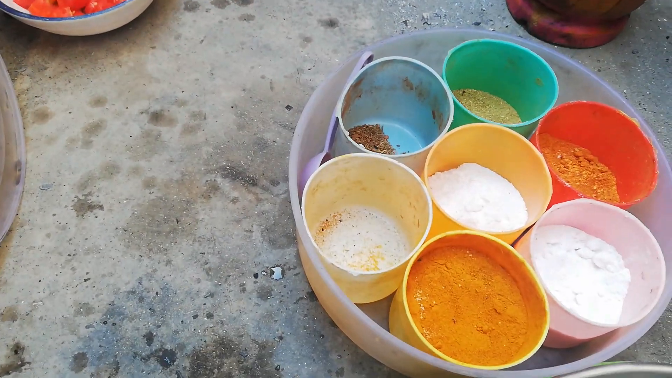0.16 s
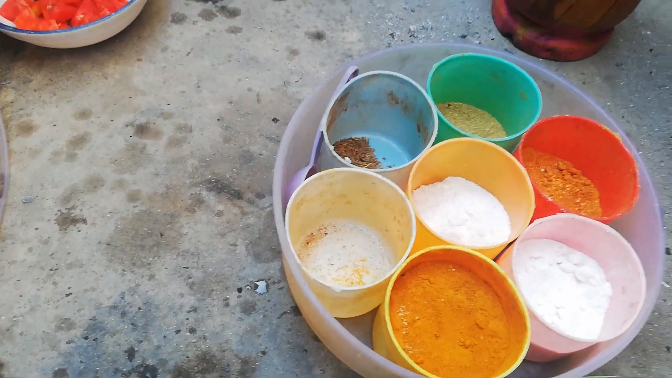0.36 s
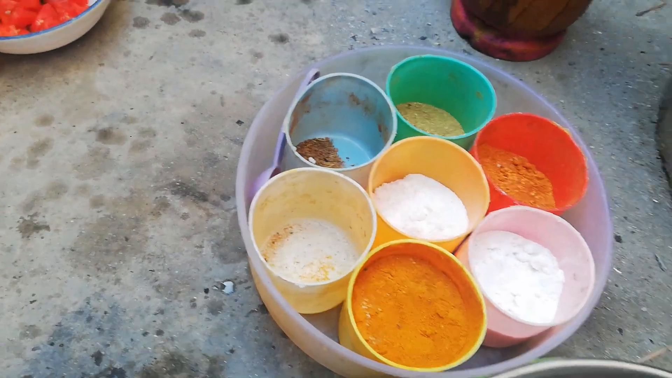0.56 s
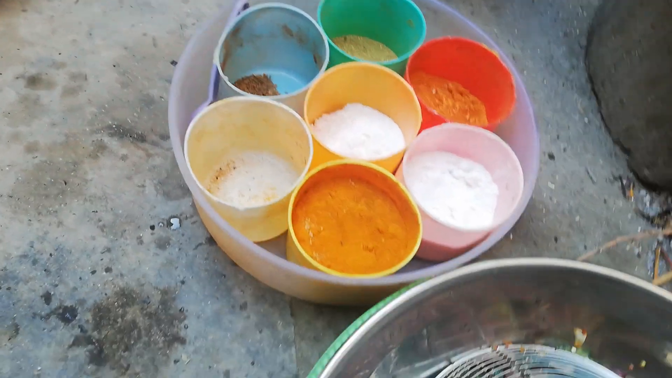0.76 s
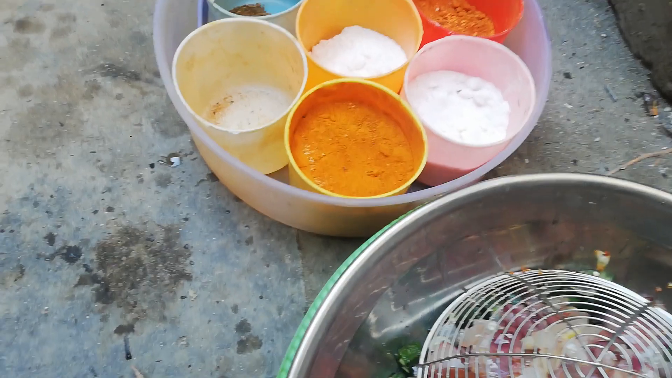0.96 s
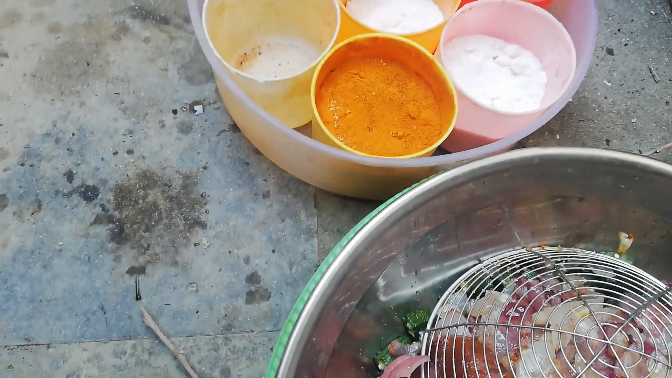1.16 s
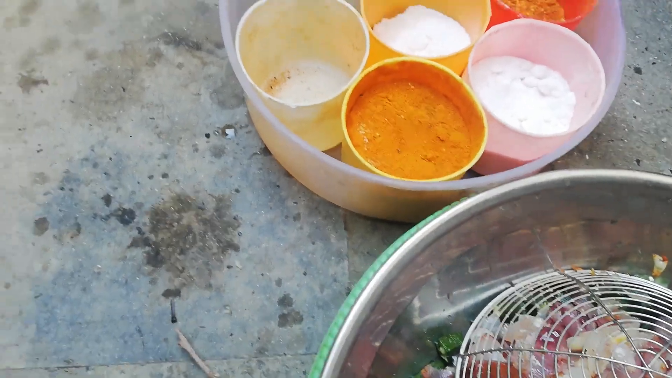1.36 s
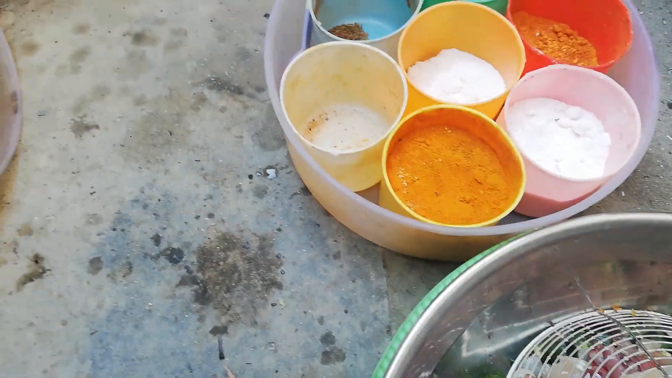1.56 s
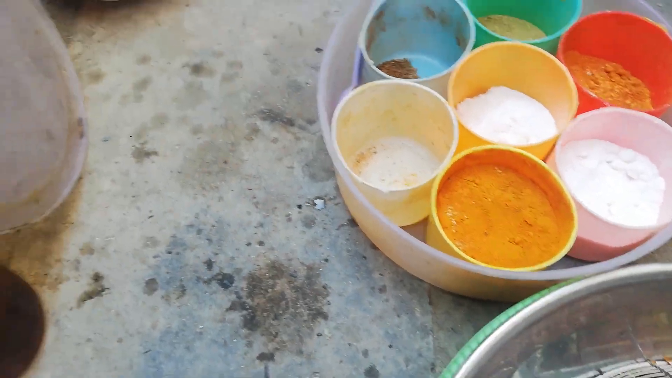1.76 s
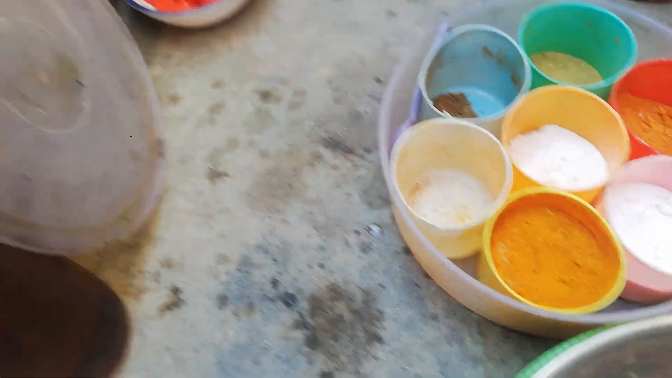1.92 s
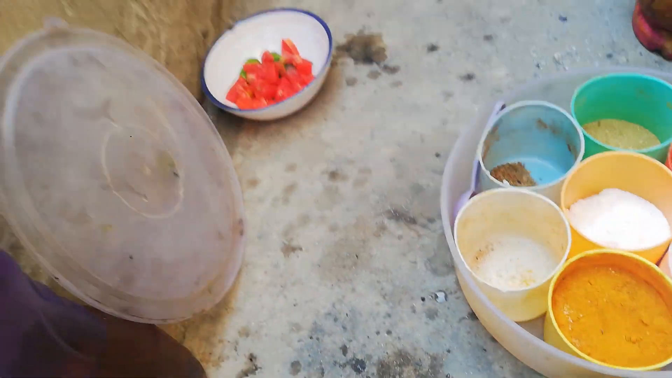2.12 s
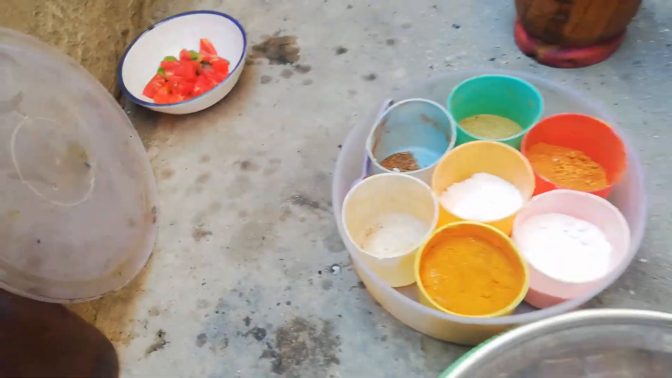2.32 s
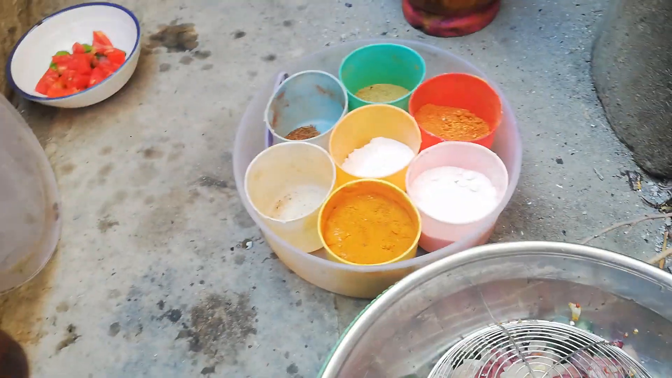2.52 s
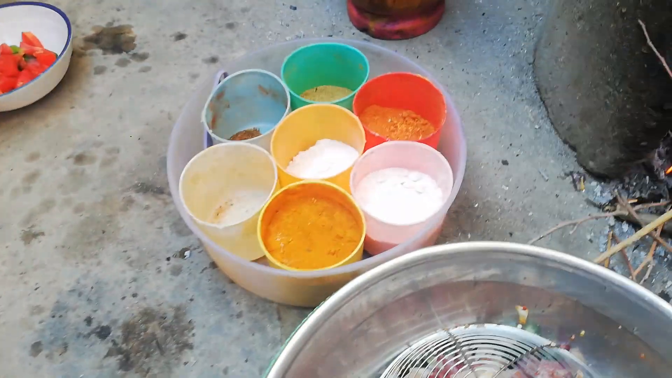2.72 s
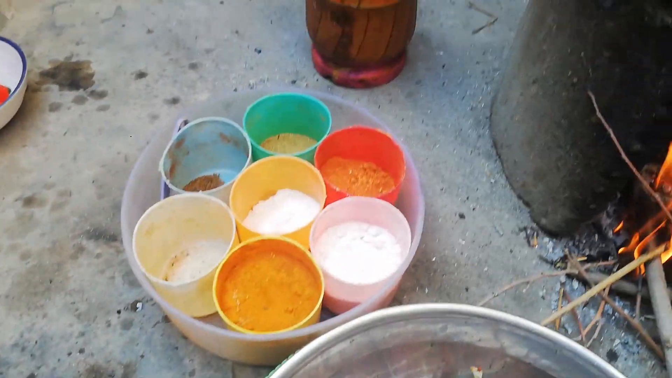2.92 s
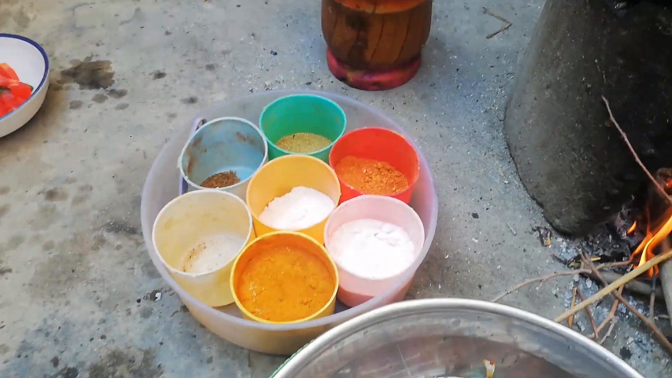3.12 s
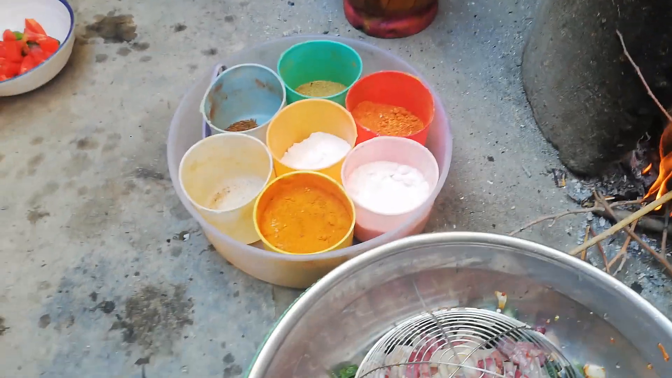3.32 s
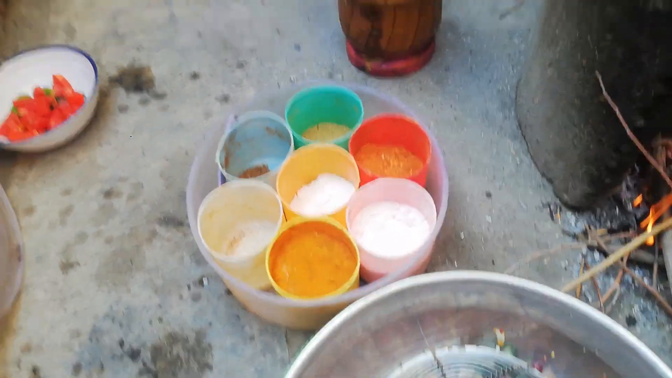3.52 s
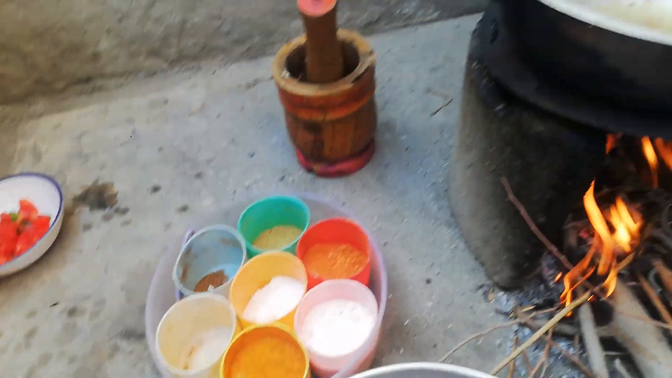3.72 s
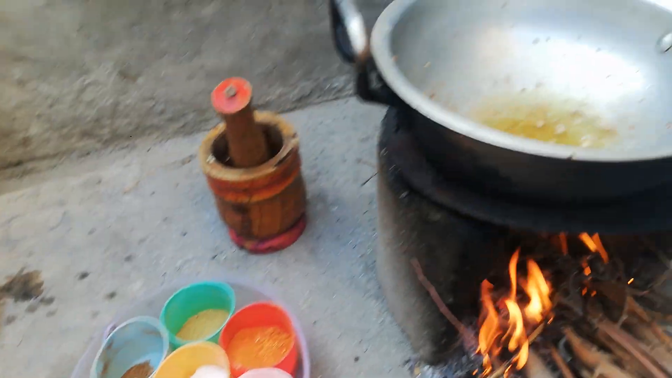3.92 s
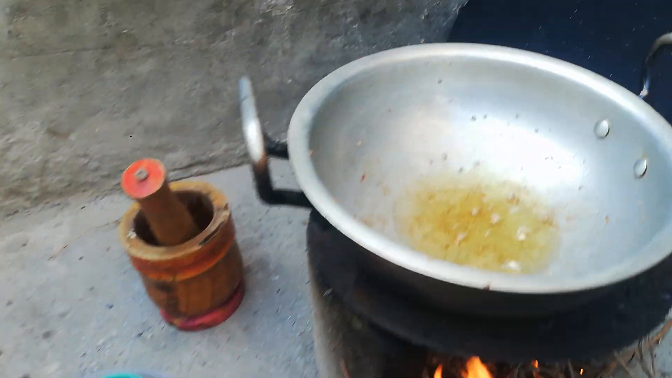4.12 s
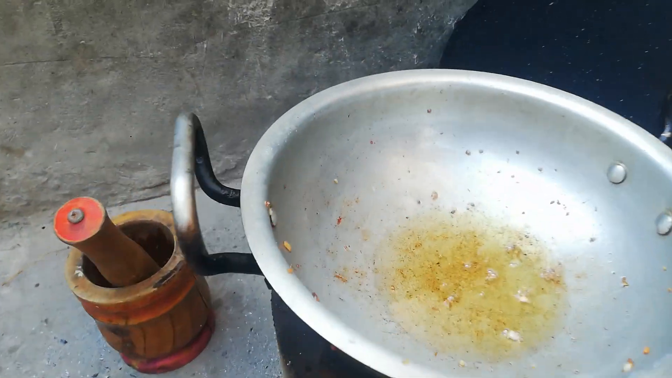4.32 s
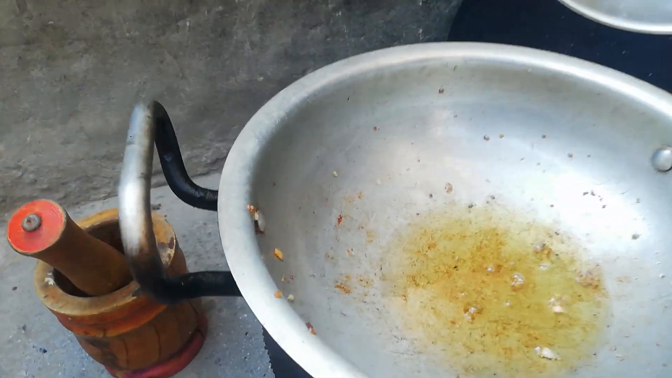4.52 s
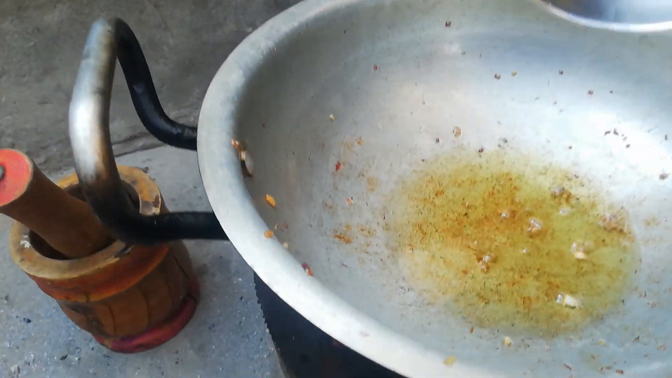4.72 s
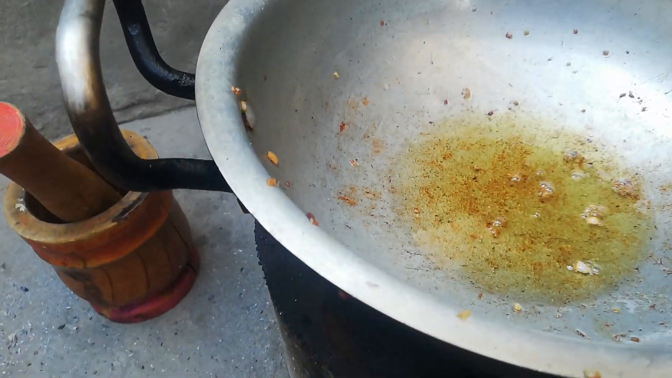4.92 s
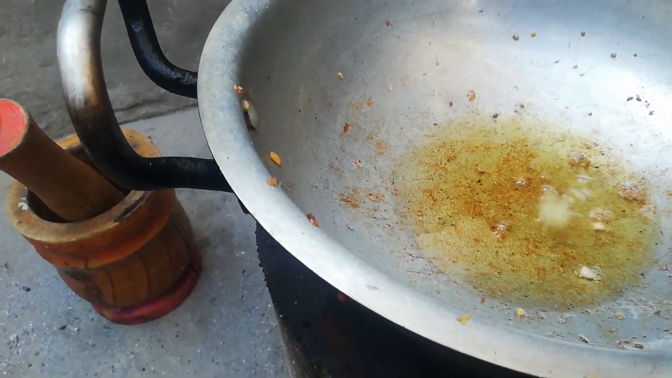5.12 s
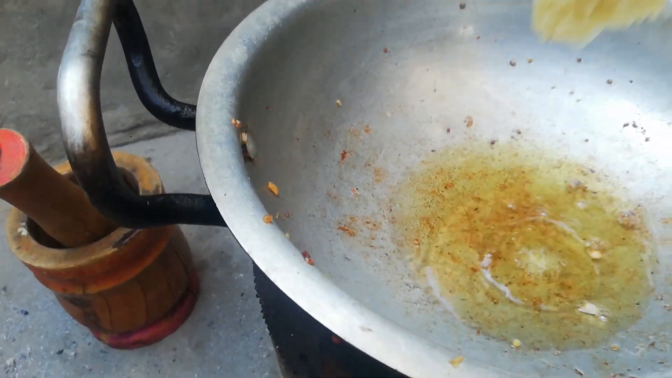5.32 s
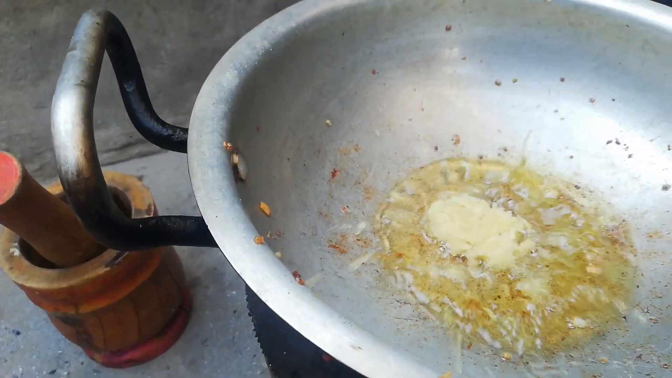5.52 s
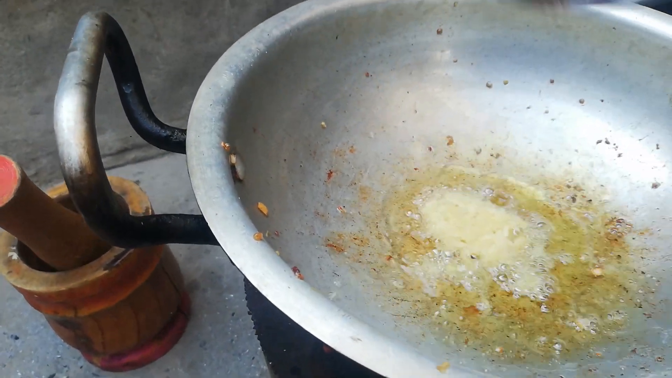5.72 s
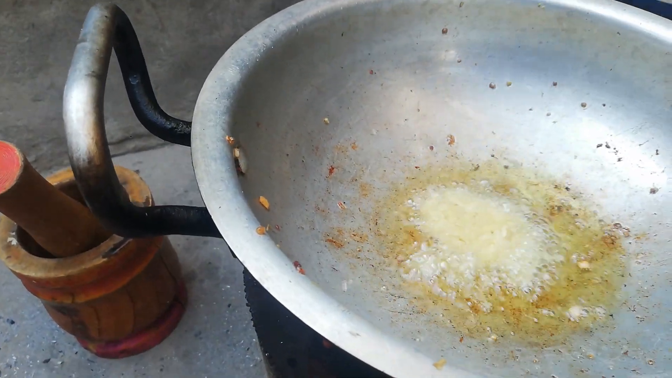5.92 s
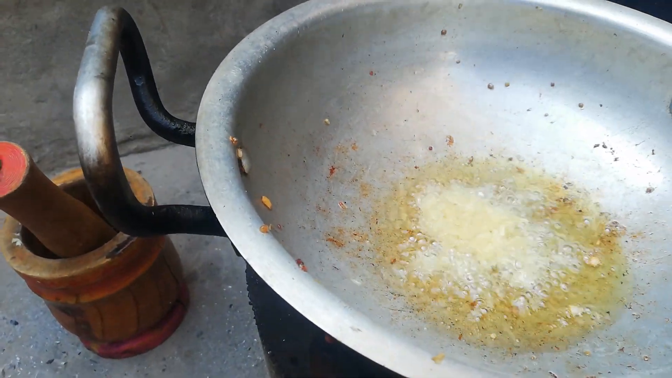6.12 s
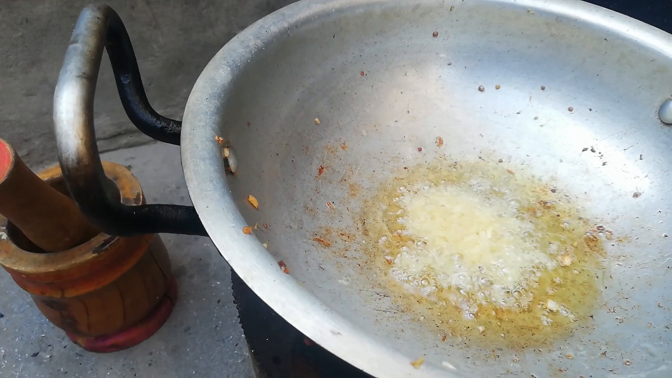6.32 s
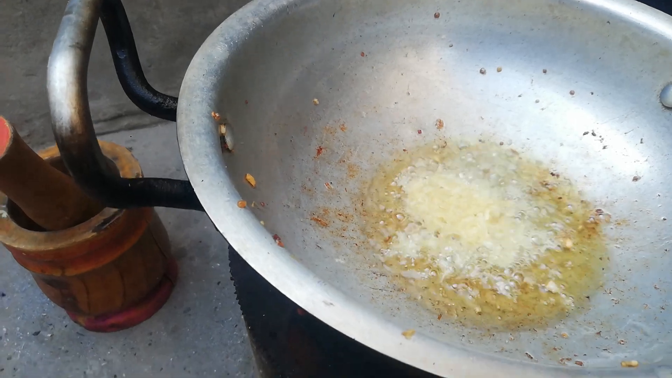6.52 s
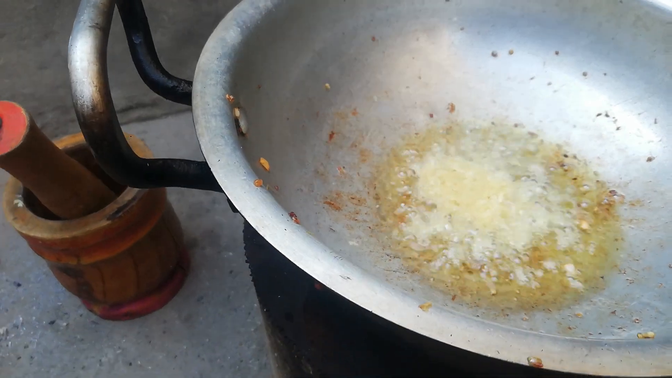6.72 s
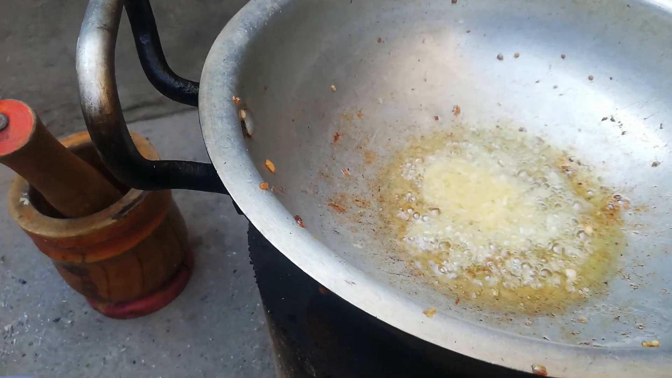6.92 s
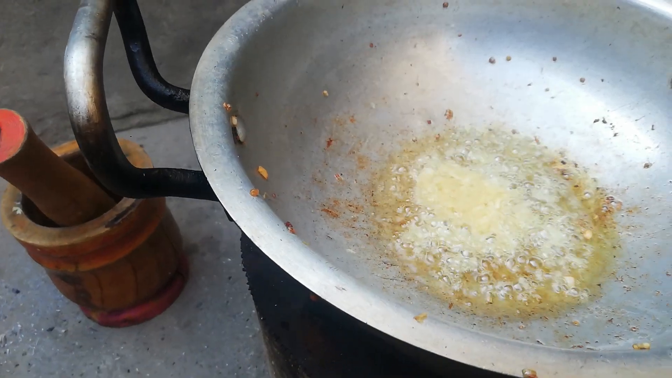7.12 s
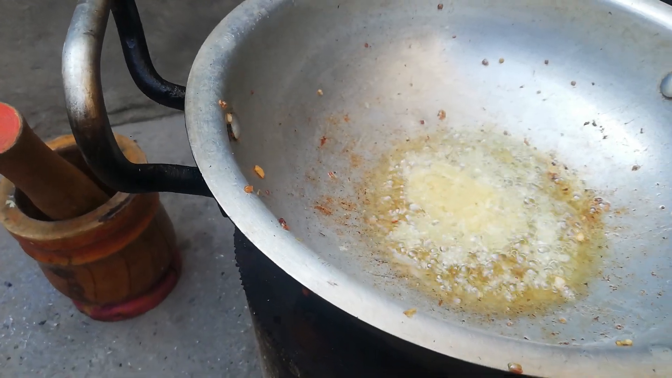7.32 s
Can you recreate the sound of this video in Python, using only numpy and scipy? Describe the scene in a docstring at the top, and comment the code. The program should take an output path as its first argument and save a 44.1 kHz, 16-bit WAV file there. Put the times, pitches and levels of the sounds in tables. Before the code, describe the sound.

A utensil knocks steadily on a hollow vessel outdoors, then near quiet with small fire snaps, until wet paste hits hot oil and sizzles loudly.

```python
"""Outdoor cooking on a wood stove: a utensil is knocked against a vessel while oil heats in a metal wok.
A few drips, then a lump of wet paste land in the oil, which sizzles and spits; metal clinks on the wok.
A low rumble lies under it all, and the right microphone port hears much more treble than the left."""
import sys
import numpy as np
from scipy import signal
from scipy.fft import rfft, irfft, next_fast_len
from scipy.io import wavfile
from scipy.ndimage import uniform_filter1d, map_coordinates

SR = 44100
rng = np.random.default_rng(int(sys.argv[2]) if len(sys.argv) > 2 else 0)


def bounce(signal):
    """Save signal as a 16-bit WAV file at the path given by the first command-line argument."""
    frames = np.transpose(np.atleast_2d(signal))
    limited = np.clip(frames, -1, 1)
    pcm = np.round(limited * 32767).astype(np.int16)
    wavfile.write(sys.argv[1], SR, pcm)


N = 328986

# blows of the utensil on the vessel: (s, strength dB, hardness: clack over body in dB)
KNOCKS = [(0.001, -31.5, -5), (0.211, -18.5, 3.5), (0.451, -19, 4), (0.7035, -16, 7), (0.9539, -16, 6), (1.2115, -18.5, -2), (1.224, -21, 2), (1.448, -15.5, 2), (1.598, -28.5, -9), (1.628, -18.5, 5.5), (1.765, -29, -0.5), (1.787, -30, -2.5), (1.915, -35.5, -8.5), (1.945, -47, -4.5), (3.576, -53, 1)]
VESSEL = [(415.2, 1.5, 0.14), (551, -14, 0.15), (760, -13.5, 0.3), (808, -1.5, 0.079), (993, -1, 0.069), (1071, -6.5, 0.25), (1306, -7, 0.034), (1610, -17.5, 0.17), (1750, -2.5, 0.045), (2150, -11, 0.055), (2176, 1.5, 0.067), (2329, 4.5, 0.036), (2534, -10.5, 0.043), (2996, -1, 0.025)]  # (Hz, dB, t60 s)
CLACK = [(59, -42), (100, -20), (177, -2), (415, -6), (595, -13), (768, -3.5), (1580, -16.5), (2270, -5), (2580, -2.5),
         (3050, -13), (3540, -26.5), (5190, -20.5), (6560, -40.5), (8460, -29), (16000, -50)]  # (Hz, dB per Hz)
CLACK_LIFE = [(200, 0.33), (800, .07), (2200, 0.051), (5000, 0.042), (12000, 0.041)]  # (Hz, t60 s)
# dull handling bumps: (s, peak dB)
BUMPS = [(0.081, -24), (0.515, -29), (1.315, -21.5), (1.674, -22.5), (1.734, -25), (1.844, -16), (1.872, -24.5),
         (1.988, -18.5)]
BUMP_MODES = [(162, -4.5, 0.27), (197, -5, 0.056), (234, 8, 0.1), (280, -4, 0.21), (330, -12, 0.034), (397, -3.5, 0.063), (620, -16.5, 0.043), (810, -13.5, 0.045)]  # (Hz, dB, t60 s)
# small dry ticks and snaps: (s, peak dB, pitch Hz)
TICKS = [(0.0492, -26, 7440), (0.1175, -29, 10320), (0.4284, -32.5, 9840), (0.478, -28.5, 7185), (1.6214, -16.5, 11400), (1.9764, -27, 10950), (2.955, -36.5, 9900), (3.2964, -37, 9750), (3.7311, -28.5, 9170), (3.92, -24.5, 10410), (4.8119, -31.5, 9200), (5.0798, -26.5, 10280)]
# the loudest bursts of steam in the oil: (s, peak dB, pitch Hz)
SPITS = [(5.4311, -13, 10620), (5.5546, -12, 4670), (6.1245, -9, 4500), (6.1486, -10, 8860), (6.2285, -11, 5000),
         (6.4301, -6.5, 8800), (6.4837, -8, 9540), (6.793, -1.5, 9460), (6.8719, -10.5, 4530), (7.0344, -12, 4790),
         (7.0797, -13, 2747), (7.19, -11, 4790), (7.2185, -11.5, 4840), (7.2404, -12.5, 4120), (7.3068, -8, 4160)]
# metal on the wok: (s, ring dB, clash dB, free ringing time s)
CLINKS = [(6.5285, -15, -25.5, 0.091), (6.647, -32, -16, 0.14), (6.792, -42.5, -26, 0.064), (6.825, -30.5, -32, 0.066), (6.897, -52.5, -21, 0.022), (6.908, -42.5, -18.5, 0.0237), (7.399, -55, -26, 0.017)]
WOK = [(787, 3.5, 0.98), (784, -34, 0.22), (1548, -12.5, 1), (1724, -8.5, 1), (2503, -37, 0.52), (4160, -13.5, 0.27), (4470, -11, 0.36)]  # (Hz, dB, t60 s)
CLASH = [(844, -8, .07), (1080, -11.5, .08), (1303, 5.5, 0.1), (1592, 11, 0.26), (1694, 1.5, 0.14), (1880, -13, 0.14), (2503, 7.5, 0.38), (2620, 0.5, 0.11), (3200, 2.5, 0.84), (3130, -6, 0.49), (3310, -10, 0.78), (4200, -11, 0.18), (4740, -3.5, 0.32), (5100, -9, 0.23), (5760, 1.5, 0.18)]  # higher bending modes of the wok: (Hz, dB, t60 s)
FRY = [(180, -56), (300, -24), (354, -29), (486, -24.5), (828, -23), (1190, -14), (1560, -20), (1750, -16), (3080, -5),
       (3640, -6), (4020, -2), (7200, -4), (9240, 2), (10700, -1), (16000, -20)]  # (Hz, dB per Hz)
SIMMER = [(1180, -35), (2000, -15), (2620, -14.5), (4300, -5), (6360, -8), (9250, 5.5), (13300, -1), (16000, -19)]  # (Hz, dB per Hz)
LOW = [(12, -41.5), (20, -2.5), (32, -13.5), (53, 4.5), (69, 7.5), (92, -5.5), (117, -3), (140, -44.5), (200, -23), (260, -48.5),
       (440, -120)]  # (Hz, dB per Hz)
AIR = [(76, -28.5), (130, -6), (372, -11), (525, -13.5), (781, -17.5), (960, -16.5), (1180, -18), (2840, -20), (8000, -23),
       (10400, -60.5), (17600, -120)]  # (Hz, dB per Hz)
# brief scuffs: (s, dB, length s)
SCUFFS = [(1.07, -54, .03), (1.29, -51, .02), (1.73, -46.5, 0.046), (2.883, -46, .025), (3.215, -42.5, 0.016), (3.243, -43, 0.013)]
SCUFF = [(530, -45.5), (900, -35), (1420, -5), (1960, -16), (2420, -20.5), (3030, -10), (3320, -12), (5200, -15.5),
         (9480, -5), (15000, -23.5)]  # (Hz, dB per Hz)
PORTS = [(60, 0), (200, 1), (380, -1), (650, -5.5), (1000, -0.5), (1900, -1), (3200, 1), (5000, -0.5), (6300, -4), (7500, -6), (9300, -17), (11000, -17.5), (13000, -6), (16000, -11)]  # (Hz, left-right dB)
ALIKE = [(160, .98), (280, 0.86), (500, -0.79), (900, 0.35), (3000, .1), (9000, -0.44)]  # (Hz, left-right likeness)
YARD = [(150, 0.99), (800, 0.51), (2500, 0.22), (5000, 0.19), (12000, 0.35)]  # (Hz, t60 s)
TOP_HZ = 15900  # fixed
TIME = np.arange(N) / SR
HIT = np.arange(SR // 3) / SR  # fixed
# the utensil rattles lightly between blows: (s, dB)
RATTLES = [(0.187, -19), (0.6741, -24), (0.918, -19.5), (1.371, -18), (1.387, -27.5)]
UTENSIL = [(744, -8.5, 0.09), (1114, -7, 0.3), (1197.6, -4.5, 0.09), (1950, 1, 0.03), (2070, -5, 0.066), (2300, -8, 0.032), (2627, -17, 0.03), (3012, -22.5, 0.022)]  # (Hz, dB, t60 s)
SUNG = [(800, 7, 0), (1215, 12, -8)]  # fixed
# brief flares of steam: (s, dB, length s, pitch Hz)
FLARES = [(5.179, -35.5, 0.018, 5600), (6.793, -19.5, 0.013, 7790), (7.055, -36, 0.011, 4000), (7.241, -27.5, 0.032, 3940)]
HOLLOW = [(1587, 66, 6.5), (1890, 140, -2), (2190, 120, 0)]  # (Hz, width Hz, dB)
# larger bubbles gulp: (s, dB, pitch Hz)
GULPS = [(6.117, -35, 1410), (6.14, -27, 1410), (6.294, -27.5, 2630), (6.432, -32, 1270), (7.017, -29.5, 1360), (7.127, -33, 1360)]
THUD_DB, BODY_DB, CLACK_DB, CRACK_DB, HOLLOW_DB = -3.5, 2, 3, -5.5, -3  # parts of a blow, over its strength
THUD_LOSS, CRACK_GAIN = 0.99, 0.61  # dB for each dB of hardness
CHOKE_S, CHOKED, STRIKE_S = .036, 0.087, .005  # the utensil settles, the share of ring left, the first contact
# wet food meets the oil, first drips and then the lump: (s, first rush dB, lasting sizzle dB, settling time s)
LANDINGS = [(5.079, -39.5, -53, 0.011), (5.139, -33, -40, 0.027), (5.432, -26.5, -32, 0.34)]
DRIP_S, LUMP_S = LANDINGS[0][0], LANDINGS[-1][0]
WETTING_S = 0.0089  # rise of each rush
FIZZ_DB, CRACKLE_DB, BUBBLING_DB = 2.5, -0.5, -16.5  # parts of the sizzle
CRACKLE_DB_PER_S, BUBBLING_DB_PER_S = 0, 4.5  # as the paste heats, crackle gives way to bubbling
CLUMP_DB, CLUMP_RATE = 2.5, 11  # the settled crackle comes in clumps, so many a second
SPUTTER_DB, SPUTTER_RISE_S, SPUTTER_FALL_S = -41, 0.1, .07  # a hollow band swells under the drips until the lump lands
SINGING_S, SINGING_DB, SINGING_RISE_S, SINGING_FALL_S = 3.62, -64, 0.22, 0.62  # a faint hollow singing comes and fades
WOK_DISTANCE = [(.3, 1.3), (1.2, 1.1), (3.9, 0.68), (4.5, 0.41)]  # from the microphone: (s, m)
SIMMER_DB = -68  # bare hot oil at 1 m
RUMBLE_DB, RUMBLE_WANDER_DB, RUMBLE_RATE = -52.5, 1.5, 7  # its level, and how far and how often a second it wanders
RUMBLE_DROP_S, RUMBLE_DROP_DB = 5.62, -3  # rumble and air are weaker towards the end
# low swells of the rumble: (s, dB, length s)
SURGES = [(1.98, -50.5, 0.089), (3.05, -52, .08), (4.15, -55, 0.24), (5.24, -41, 0.07)]
FAINT_TICK_DB, FAINT_TICK_HZ = -43, 9400  # the wood fire snaps at random
CONTACT_S = .0005  # rise of a blow
LULL_S, LULL_DB, LULL_LENGTH_S = 6.98, -6, 0.041  # the crackle thins briefly
TOP_FIZZ_DB, TOP_FIZZ_DB_PER_S = -8, -6  # the finest fizz fades as the paste heats
FAINT_SPIT_DB, FAINT_SPIT_HZ = -16.5, 5240  # smaller spits come at random while the paste fries
CAVITY, CAVITY_RISE_S = [(767.5, 0.5, .17), (728, -9.5, 0.22)], .018  # the vessel's hollow note (Hz, dB, t60 s), and its rise
SETTLE_START_S, SETTLE_S = 0.072, 0.97  # the first rush thins out into separate pops
WOK_ECHO_DB, KNOCK_ECHO_DB = -19, -17.5  # the yard's answer


def amp(db):
    return 10 ** (np.asarray(db) / 20)


def unit(x):
    return x / np.sqrt(np.mean(x ** 2) + 1e-20)


def crest(x):
    """Scale a hit so that its loudest 4 ms have rms 1."""
    return x / np.sqrt(uniform_filter1d(np.mean(x ** 2, axis=0), size=176).max() + 1e-20)


def along(points, hz):
    """(Hz, value) points on a log axis."""
    f, v = np.transpose(points)
    return np.interp(np.log(hz + 1), np.log(f + 1), v)


def curves(rows):
    """One value per sample for each column after the time."""
    s, *cols = np.transpose(rows)
    return [np.interp(TIME, s, c) for c in cols]


def filtered(x, response):
    """x times a response of frequency."""
    n = x.shape[-1]
    m = next_fast_len(n + 8192)  # fixed
    return irfft(rfft(x, m) * response(np.fft.rfftfreq(m, 1 / SR)), m)[..., :n]


def band(x, lo_hz, hi_hz):
    """Causal band-pass."""
    return signal.sosfilt(signal.butter(3, [lo_hz, min(hi_hz, SR / 2 - 1)], 'band', fs=SR, output='sos'), x)  # fixed


def spread(pair):
    """Two unrelated signals become left and right: alike in the bass, unrelated above."""
    turn = lambda hz: np.arccos(np.clip(along(ALIKE, hz), -1, 1)) / 2
    mid, side = filtered(pair, lambda hz: np.array([np.cos(turn(hz)), np.sin(turn(hz))]))
    return np.array([mid + side, mid - side])


def noise(spectrum, n):
    """Coloured stereo noise of rms 1."""
    return unit(filtered(spread(rng.standard_normal((2, n))), lambda hz: amp(along(spectrum, hz))))


def dying(x, lives):
    """Each frequency of x dies at its own speed."""
    hz, t, z = signal.stft(x, SR, nperseg=128)
    return signal.istft(z * amp(-60 * t / along(lives, hz)[:, None]), SR, nperseg=128)[1][:, :x.shape[1]]


def ring(modes, scatter_db, phase_spread, lead=0):
    """Struck modes; each reaches the two ports with its own strength and phase, the left lead radians early."""
    hz, db, t60 = np.transpose(modes)[:, :, None]
    size, phase = rng.standard_normal((2, 2, len(modes)))
    waves = amp(db - 60 * HIT / t60) * np.exp(2j * np.pi * hz * HIT)
    return crest(((amp(scatter_db * size) * np.exp(1j * (phase_spread * phase + [[lead], [0]]))) @ waves).imag)


def add(track, s, sound):
    """Mix a sound in at time s."""
    i = max(round(s * SR), 0)
    track[:, i:i + sound.shape[1]] += sound[:, :N - i]


def pops(rate, pitch_hz, pitch_spread, cycles, size_db, splash=.3, life=.002):
    """Bursting bubbles of rms 1: damped sines, mostly small, each with its own scatter off the wok walls."""
    count = int(rate * N / SR)
    u = rng.random((count, 4))  # fixed
    hz = np.float32(np.clip(pitch_hz * np.exp(pitch_spread * rng.standard_normal((count, 1))), 300, 16000))  # fixed
    size = np.float32(amp(size_db * -np.log(1 - .97 * u[:, :1])))  # fixed
    k = np.arange(int(min(4 * life, .012) * SR))  # fixed
    t, at = np.float32(k / SR), (u[:, 1:2] * N).astype(int) + k
    splashes = np.float32(splash * np.sign(u[:, 3:] - .5)) * np.float32(np.exp(-t / life))
    pair = []
    for lag in (np.float32(u[:, 2:3] * .0002), 0):  # bubbles lie all over the pool, a little to the right
        turns = np.maximum(t - lag, 0) * hz
        pop = np.sin(2 * np.pi * turns) * np.exp(-turns / cycles)
        scatter = np.float32(rng.standard_normal(N + SR))[at]
        pair.append(np.bincount(at.ravel(), (size * (pop + splashes * scatter)).ravel(), N)[:N])
    return unit(np.array(pair))


def knocks():
    """Damped blows: the harder the contact, the more clack and crack and the less thud."""
    out = np.zeros((2, N))
    pressed = CHOKED + (1 - CHOKED) * np.exp(-(HIT / CHOKE_S) ** 4)  # the utensil settles and chokes the ring
    for s, db, hardness in KNOCKS:
        dense = crest(dying(noise(CLACK, len(HIT)), CLACK_LIFE))
        modes = ring(VESSEL, scatter_db=1.5, phase_spread=.9)
        blow = pressed * (dense + amp(1) * modes) * (1 + 1.0 * np.exp(-HIT / STRIKE_S)) * (1 - np.exp(-HIT / CONTACT_S))
        parts = [(THUD_DB - THUD_LOSS * hardness, 110, 520), (BODY_DB, 620, 1500),
                 (CLACK_DB + hardness, 1600, 3400), (CRACK_DB + CRACK_GAIN * hardness, 3600, 12500)]
        sound = sum(amp(part_db) * crest(band(blow, lo, hi)) for part_db, lo, hi in parts)
        # the vessel's hollow note builds up just after the blow
        hollow = crest(ring(CAVITY, scatter_db=-3, phase_spread=0.51, lead=2.45) * pressed * (1 - np.exp(-HIT / CAVITY_RISE_S)))
        add(out, s + .002, amp(db) * (sound + amp(HOLLOW_DB) * hollow))  # fixed
    return out


def bumps():
    """Soft contacts wake only low modes, with a short dull puff."""
    out = np.zeros((2, N))
    for s, db in BUMPS:
        tone = ring(BUMP_MODES, scatter_db=3.0, phase_spread=.2)
        puff = crest(band(spread(rng.standard_normal((2, len(HIT)))), 100, 380) * amp(-60 * HIT / .09))
        add(out, s + .001, amp(db - 2.5) * (tone + amp(-6) * puff) * (1 - np.exp(-HIT / 0.002)))
    return out


def snaps(rows, gain_db, t60, tone_db, tone_t60, scatter):
    """Sharp cracks, each with a short scatter off nearby walls and a ping at its own pitch."""
    out = np.zeros((2, N))
    t = HIT[:SR // 10]
    for s, db, hz in rows:
        burst = amp(-60 * t / t60) + scatter * amp(-60 * t / .03)
        crack = crest(band(rng.standard_normal((2, len(t))) * burst, 2570, 11000))
        ping = crest(band(rng.standard_normal((2, len(t))) * amp(-60 * t / tone_t60), hz * 0.923, hz * 1.1))
        add(out, s + 0.0013, amp(db + gain_db) * crest(crack + amp(tone_db) * ping))
    return out


def clinks():
    """Metal meets the wok: a clash of many modes, and a clear ring that the contact cuts short."""
    out = np.zeros((2, N))
    for s, ring_db, clash_db, free in CLINKS:
        held = np.exp(-(HIT / free) ** 4)  # fixed
        tone = ring(WOK, scatter_db=2.0, phase_spread=0.12, lead=2.8) * amp([[-3], [1.5]])
        clash = ring(CLASH, scatter_db=2, phase_spread=1.2)  # fixed
        scrape = crest(band(rng.standard_normal((2, len(HIT))), 770, 2800) * amp(-60 * HIT / 0.21))
        thud = crest(band(rng.standard_normal((2, len(HIT))), 240, 450) * amp(-60 * HIT / 0.11))
        add(out, s, held * (amp(ring_db) * tone + amp(clash_db) * crest(clash * amp(-60 * HIT / 2.2) + 0.83 * scrape + amp(-21.5) * thud)))
    return out


def sizzle():
    """Water boils out of the paste: each landing starts a rush of fizz, crackle and low bubbling that settles."""
    boiling = np.zeros(N)
    for s, rush_db, lasting_db, settle_s in LANDINGS:
        age = np.maximum(TIME - s, 0)
        level = amp(lasting_db + (rush_db - lasting_db) * np.exp(-age / settle_s))
        boiling = np.maximum(boiling, level * (1 - np.exp(-age / WETTING_S)))
    frying_s = np.maximum(TIME - LUMP_S, 0)
    settled = np.clip((frying_s - SETTLE_START_S) / SETTLE_S, 0, 1)
    dense = pops(rate=6100, pitch_hz=6000, pitch_spread=0.63, cycles=2.9, size_db=0.5, splash=0.63, life=0.00066)
    sparse = pops(rate=450, pitch_hz=7500, pitch_spread=.45, cycles=2.5, size_db=4.8, splash=.3, life=.003)  # fixed
    pings = pops(rate=120, pitch_hz=4730, pitch_spread=.2, cycles=41, size_db=3.0, splash=0.084, life=0.0013)
    low = pops(rate=91, pitch_hz=1410, pitch_spread=0.31, cycles=0.95, size_db=12.5, splash=0.093, life=.002)
    boil = dense * (1 - 0.29 * settled) + sparse * (0.71 + 0.13 * settled) + .4 * pings + 0.31 * settled * low
    boil = filtered(boil, lambda hz: amp(along(FRY, hz)))
    lull_db = LULL_DB * np.exp(-((TIME - LULL_S) / LULL_LENGTH_S) ** 2)
    layers = [(TOP_FIZZ_DB + TOP_FIZZ_DB_PER_S * frying_s, 11500, 15800), (FIZZ_DB, 6500, 11500),
              (CRACKLE_DB + CRACKLE_DB_PER_S * frying_s + CLUMP_DB * settled * wobble(CLUMP_RATE) + lull_db, 2100, 6500),
              (BUBBLING_DB + BUBBLING_DB_PER_S * frying_s - 5 * (TIME < LUMP_S), 330, 2100)]
    fry = boiling * sum(amp(db) * unit(filtered(boil, lambda hz: 1 / (1 + (lo / (hz + 1)) ** 10 + (hz / hi) ** 10))) for db, lo, hi in layers)
    flares = sum(swells([(s, db, length)]) * unit(band(boil, hz * 0.503, hz * 1.66)) for s, db, length, hz in FLARES)
    sputter = (TIME > DRIP_S) * amp(SPUTTER_DB) * peak(LUMP_S, SPUTTER_RISE_S, SPUTTER_FALL_S) * amp(3.4 * wobble(60)) * resonant(HOLLOW)
    return fry + flares + sputter


def background():
    """Low rumble, open air, the faint simmer of bare oil, a hollow singing and a few gritty scuffs."""
    rumble_db = RUMBLE_DB + RUMBLE_WANDER_DB * wobble(RUMBLE_RATE)
    calm = amp(RUMBLE_DROP_DB * np.clip((TIME - RUMBLE_DROP_S) / .2, 0, 1))
    rumble = (amp(rumble_db) + swells(SURGES)) * noise(LOW, N)
    fine = pops(rate=9800, pitch_hz=7000, pitch_spread=.6, cycles=.7, size_db=0.5, splash=0.93, life=0.0007)
    simmer = amp(SIMMER_DB) / curves(WOK_DISTANCE)[0] * unit(filtered(fine, lambda hz: amp(along(SIMMER, hz))))
    singing = amp(SINGING_DB) * peak(SINGING_S, SINGING_RISE_S, SINGING_FALL_S) * resonant(SUNG)
    grit = pops(rate=900, pitch_hz=4000, pitch_spread=.8, cycles=.6, size_db=2.5, splash=.4, life=.001)  # fixed
    scuffs = swells(SCUFFS) * unit(filtered(grit, lambda hz: amp(along(SCUFF, hz))))
    return calm * (rumble + amp(-62) * noise(AIR, N)) + simmer + singing + scuffs


def yard(x):
    """The walls around answer with a faint tail."""
    tail = dying(spread(rng.standard_normal((2, SR))), YARD)
    return signal.fftconvolve(x, tail / np.linalg.norm(tail[0]), axes=1)[:, :N]


def rattles():
    """A light touch rings the utensil itself, until the next blow stops it."""
    out = np.zeros((2, N))
    for s, db in RATTLES:
        tick = crest(band(rng.standard_normal((2, len(HIT))), 300, 9000) * amp(-60 * HIT / .035))  # fixed
        tone = ring(UTENSIL, scatter_db=2, phase_spread=1) * np.exp(-(HIT / .035) ** 2)
        add(out, s, amp(db) * crest(tone + amp(-7.5) * tick))
    return out


def resonant(tones):
    """Stereo noise of rms 1 in a few narrow resonances."""
    shape = lambda hz: sum(amp(db) / (1 + ((hz - centre) / width) ** 2) for centre, width, db in tones)
    return unit(filtered(rng.standard_normal((2, N)), shape))


def gulps():
    """A large bubble bursts with a short, low plop."""
    out = np.zeros((2, N))
    t = HIT[:SR // 20]
    for s, db, hz in GULPS:
        add(out, s, amp(db) * crest(band(rng.standard_normal((2, len(t))) * amp(-60 * t / 0.023), hz * 0.73, hz * 1.3)))
    return out


def swells(rows):
    """A bell-shaped gain for each (s, dB, length s)."""
    return sum(amp(db) * np.exp(-((TIME - s) / length) ** 2) for s, db, length in rows)


def wobble(rate):
    """A smooth random curve, rate knots a second."""
    return map_coordinates(rng.standard_normal(512), [TIME * rate], mode='mirror')  # fixed


def peak(s, rise_s, fall_s):
    """A gain that grows to 1 at time s and dies away again."""
    return np.exp(np.minimum((TIME - s) / rise_s, (s - TIME) / fall_s))


def ticks():
    """A few clear ticks, and fainter snaps from the fire at random."""
    faint = [(u * N / SR, FAINT_TICK_DB + 6 * (v - .5), FAINT_TICK_HZ) for u, v in rng.random(size=(10, 2))]
    return snaps(TICKS + faint, gain_db=-10.5, t60=0.05, tone_db=1.5, tone_t60=.03, scatter=.1)


def spits():
    """Pockets of steam burst through the oil: the loud ones, and smaller ones at random."""
    faint = [(LUMP_S + u * (N / SR - LUMP_S), FAINT_SPIT_DB + 8 * (v - .5), FAINT_SPIT_HZ * 2 ** (1.6 * (w - .5)))
             for u, v, w in rng.random(size=(24, 3))]
    return snaps(SPITS + faint, gain_db=-8.0, t60=0.0026, tone_db=2.5, tone_t60=0.018, scatter=0.13)


def scene():
    """Knocks nearby and the frying wok, both with the yard's answer, over the background."""
    hits = knocks() + rattles() + bumps() + ticks()
    wok = sizzle() + spits() + gulps() + clinks()
    wok = wok + amp(WOK_ECHO_DB) * yard(wok)
    return hits + amp(KNOCK_ECHO_DB) * yard(hits) + wok + background()


def record(dry):
    """The two ports differ in colour; peaks clip, and nothing passes above the band limit."""
    def ports(hz):
        gains = amp(along(PORTS, hz) * np.array([[.5], [-.5]]))
        return gains / np.sqrt(np.mean(gains ** 2, axis=0))
    clipped = np.clip(filtered(dry, ports), -.94, .94)  # fixed
    return filtered(clipped, lambda hz: hz < TOP_HZ)


dry = scene()
out = record(dry)
bounce(out)
```